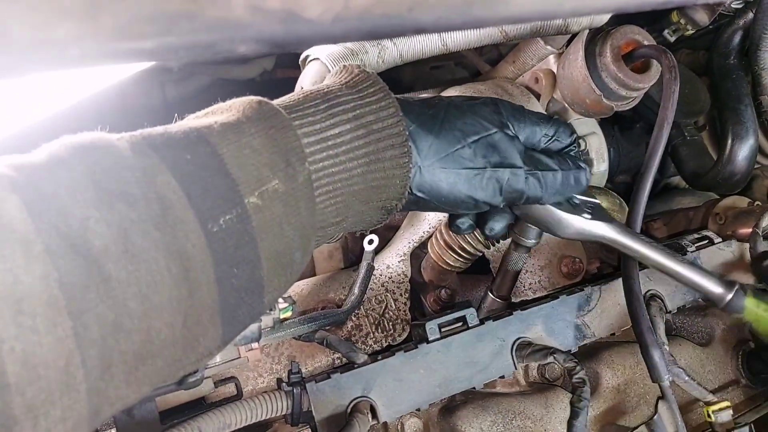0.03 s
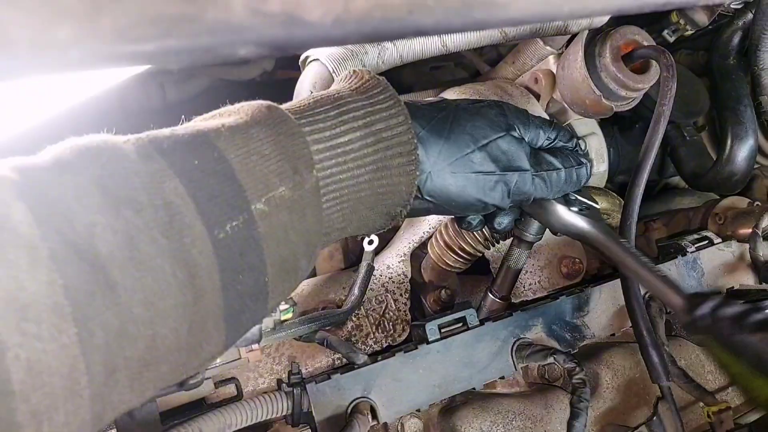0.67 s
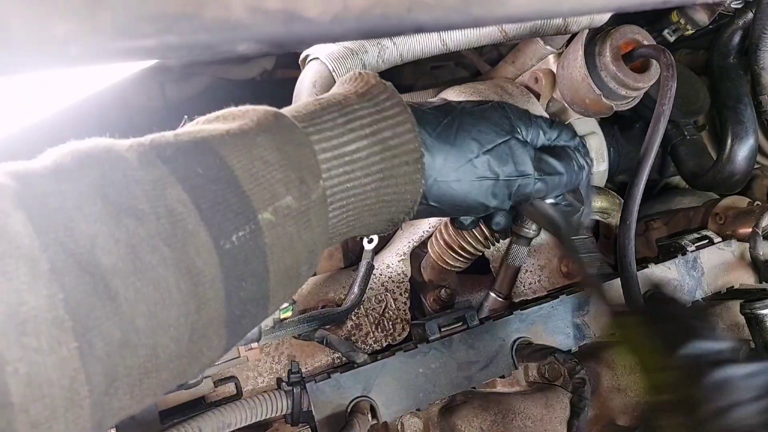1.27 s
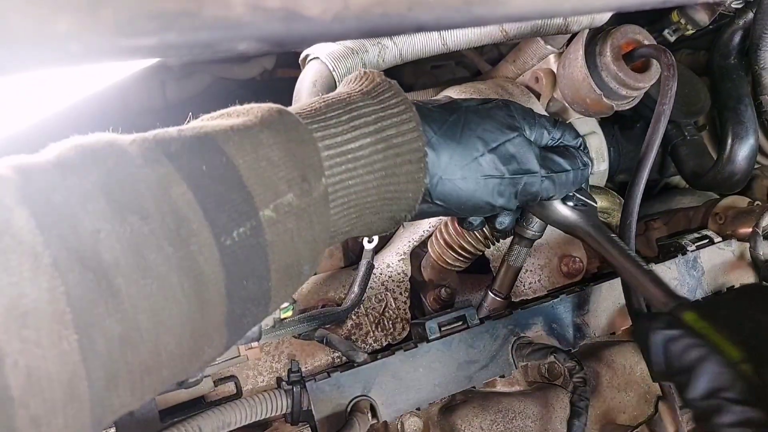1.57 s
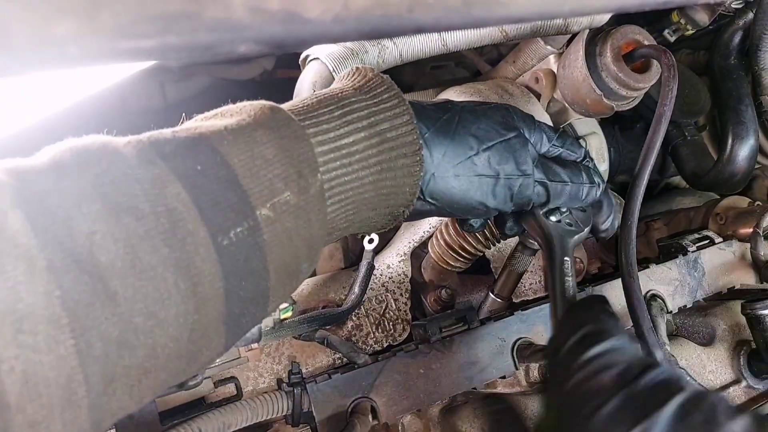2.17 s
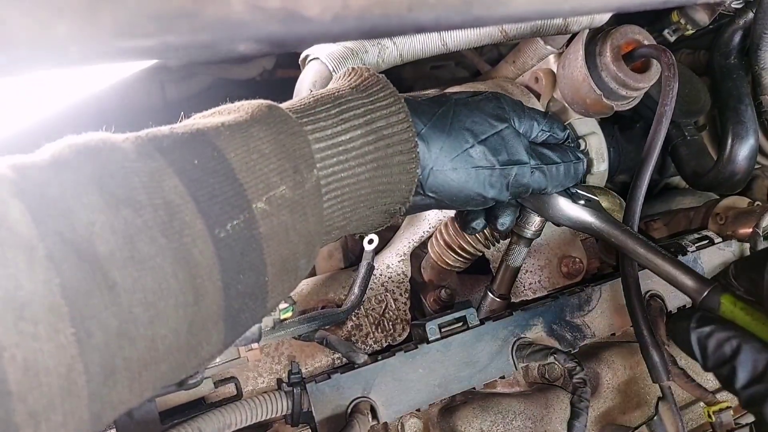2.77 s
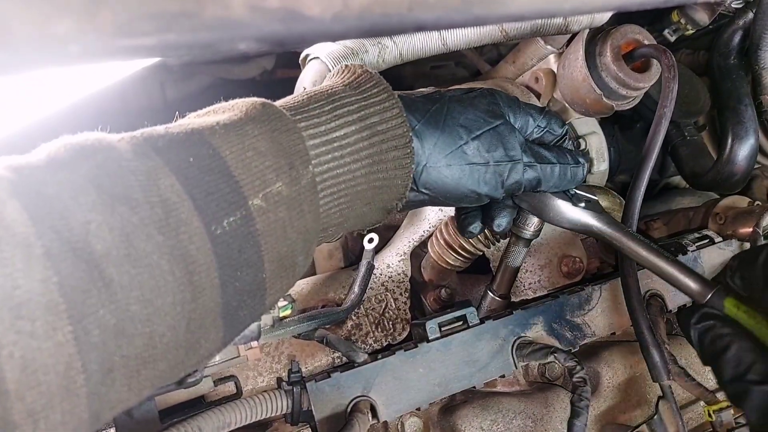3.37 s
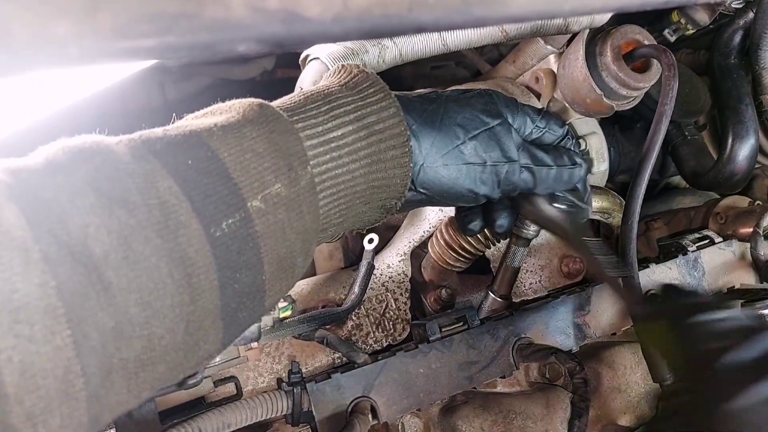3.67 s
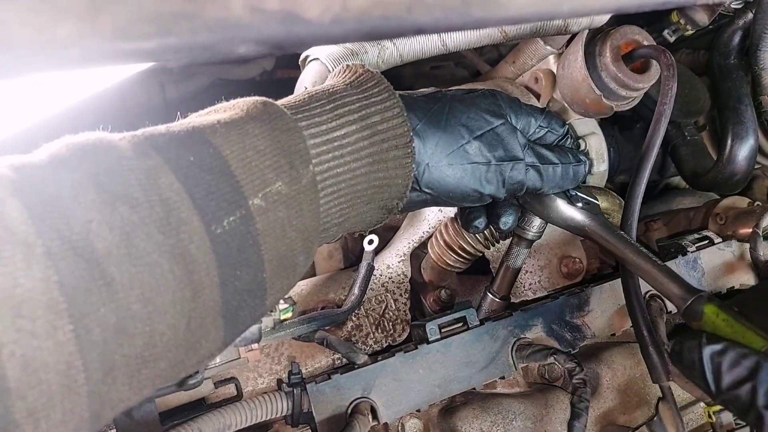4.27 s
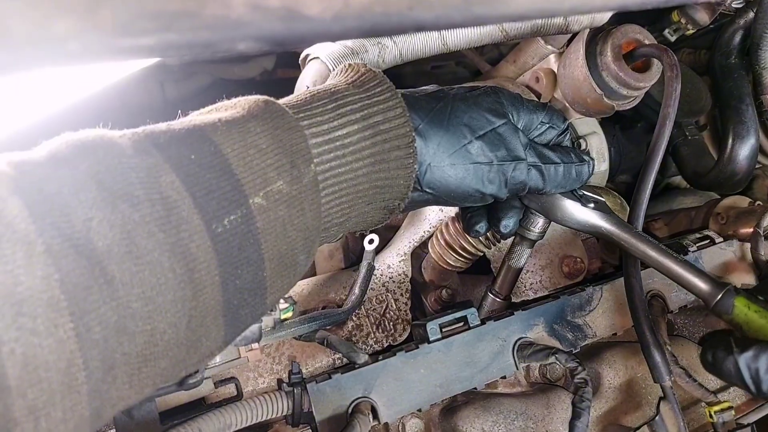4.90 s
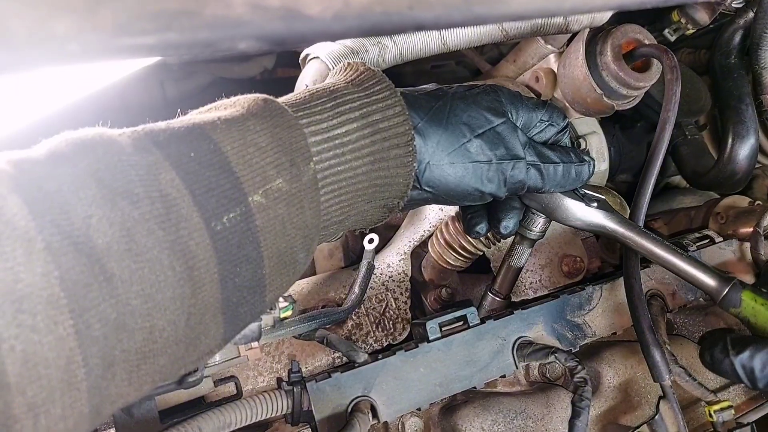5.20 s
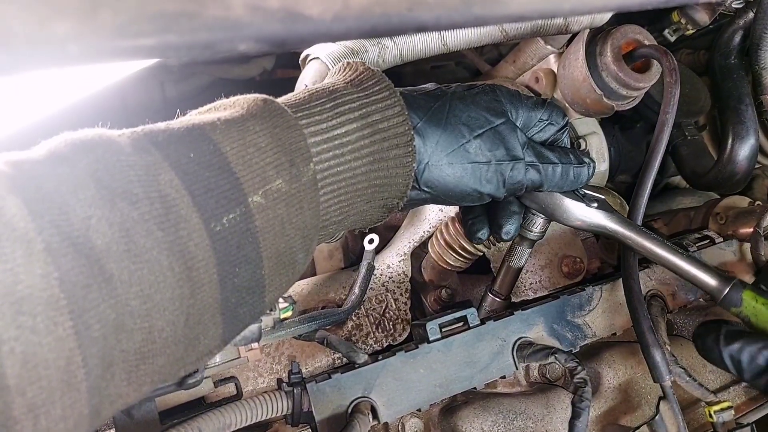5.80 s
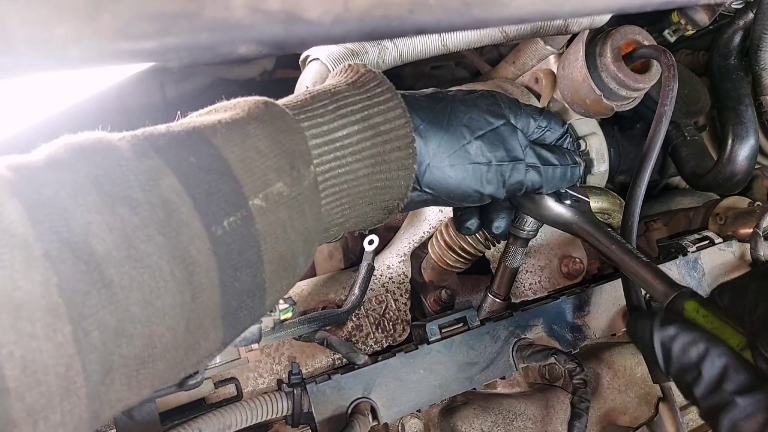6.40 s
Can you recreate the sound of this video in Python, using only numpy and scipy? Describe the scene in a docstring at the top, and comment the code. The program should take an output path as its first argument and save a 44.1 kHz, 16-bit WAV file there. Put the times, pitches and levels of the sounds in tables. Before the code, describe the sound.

A stuck glow plug grinds in its threads over five irregular pulls of a ratchet, heard close with a brief garage echo. The first pulls creak and squeak; the later ones break into single, ringing metal cracks. Quick ratchet clicks, light knocks and soft glove rubbing fill the gaps and close the sequence, with faint steady air underneath.

```python
"""In a garage, close up, a ratchet backs a seized glow plug out of an engine.
The dry thread sticks and slips: fast slips creak, slow ones part into single cracks, and all ring
the same metal. Now and then friction wakes a short squeal. On each back swing the pawl (the catch
in the ratchet) ticks over the teeth and a glove rubs; the ratchet knocks as it takes up its slack.
A short echo follows the tool, and the air rumbles faintly underneath."""
import sys
import numpy as np
from scipy import signal
from scipy.fft import rfft, irfft, next_fast_len
from scipy.io import wavfile
from scipy.ndimage import uniform_filter1d

SR = 44100
rng = np.random.default_rng(int(sys.argv[2]) if len(sys.argv) > 2 else 0)


def int16_out(signal):
    """Quantize to a 16-bit WAV file."""
    q = np.round(np.clip(np.atleast_2d(signal).T, -1, 1) * 32767)
    wavfile.write(sys.argv[1], SR, q.astype(np.int16))


N = 284445
TAPS = 4096  # samples in the sound of one blow
HZ = np.fft.rfftfreq(TAPS, 1 / SR)
TIME = np.arange(N) / SR

# The first four pulls creak, one curve each. Each point: time in seconds, relative level in dB.
CREAK_CURVES = [
    [(0.0, -32.5), (0.058, -33), (0.08, -24.5), (0.118, -30), (0.138, -42.5), (0.148, -31), (0.154, -34.5)],
    [(0.602, -41.5), (0.606, -35.5), (0.634, -45.5), (0.704, -34.5), (0.722, -27.5), (0.748, -38.5),
     (0.77, -29), (0.782, -43), (0.82, -44.5), (0.846, -24.5), (0.884, -32), (0.894, -23.5), (0.924, -26),
     (0.934, -37)],
    [(1.598, -35), (1.624, -31.5), (1.726, -30.5), (1.738, -21), (1.758, -27.5), (1.792, -20),
     (1.923, -19.5)],
    [(2.608, -33.5), (2.616, -33), (2.716, -27), (2.728, -30.5)],
]
# Each creak slows down. Each row: base slips per second at its start, and at its end.
SLIP_RATES = [(1054, 440), (472, 380), (309, 190), (239.7, 100)]
# Single slips of the thread. Each row: time in seconds, relative level in dB.
CRACKS = [(1.5892, -24), (1.936, -9.5), (2.5844, -22.5), (2.7395, -14), (2.765, -14), (2.7847, -14),
          (2.8, -12.5), (2.8123, -13), (2.824, -12), (2.8378, -10.5), (2.8563, -12), (2.9246, -15),
          (2.9496, -13), (2.9696, -12), (2.9929, -12), (3.0495, -14.5), (3.0694, -23.5), (3.0986, -12),
          (3.1212, -28.5), (3.2128, -14), (4.0652, -39.5), (4.124, -19), (4.1336, -16.5), (4.1609, -15.5),
          (4.1928, -14.5), (4.2109, -13.5), (4.3298, -38), (4.3597, -14.5), (4.416, -11.5), (4.5149, -31.5),
          (4.5308, -13.5), (4.564, -10.5), (4.641, -13), (4.6605, -10), (4.7561, -12), (4.782, -8.5),
          (4.8424, -8.5), (4.8883, -7.5), (4.9075, -7), (4.9739, -8.5), (5.0813, -12), (5.1061, -8),
          (5.1747, -9.5), (5.2102, -8), (5.2909, -9.5), (5.3304, -8.5), (5.529, -43), (5.6316, -14)]
# Faint creeping between cracks. Each row: start and end in seconds, relative level reached in dB.
CREEPS = [(4.079, 4.206, -45.5), (4.343, 4.407, -43.5), (4.847, 4.877, -35.5)]
# Each pull starts with a loose socket that tightens under load. Each row: start and time until tight
# in seconds, then in dB the extra rattle while loose and the tight socket's ring, thud into the
# engine, bite near 4 kHz, treble and top octave.
PULLS = [(0, 0.071, 4, -12, -5.5, -9.5, -4, 1.5), (.6, 0.27, 10.5, -4.5, -24, -8, -6, 0.5),
         (1.585, 0.27, 15.5, -7.5, -4, -8.5, -9, -4), (2.58, 0.31, 9, -1.5, -1.5, -12, -6, -1),
         (4.06, 0.78, 10.5, -8, -6, -15, -5, -2)]
# Resonances of plug, socket and cylinder head. Each row: pitch in Hz, width in Hz, level in dB.
BODY_RESONANCES = [(76, 41, -17.5), (217.6, 190, -14.5), (370, 200, -26), (704, 200, -15),
                   (1114, 200, -11.5), (1259, 31, -14), (1560, 300, -15.5), (1836, 150, -5.5),
                   (1980, 110, -16.5), (2230, 86, -6.5), (2750, 484, 8.5), (3153, 590, 8), (3482, 110, 6),
                   (3920, 210, 2.5), (4370, 1200, 5.5), (4560, 200, -11.5), (5300, 360, -18.5),
                   (5490, 780, -6), (6060, 1600, -31), (6880, 920, -4), (7913, 830, -3.5),
                   (9387, 380, -26.5), (10400, 4100, -13.5), (11860, 3400, -9.5), (12400, 500, -8),
                   (13740, 353, -20.5), (14300, 820, -12.5), (15700, 670, -15.5)]
# Longer rings of the socket, the handle and the hollow ratchet head.
# Each row: pitch in Hz, relative level in dB, seconds to fade by 60 dB.
SOCKET_RINGS = [(2890, -30, 0.19), (3150, -6.5, 0.044), (4660, -30.5, 0.059)]
HANDLE_RINGS = [(543, -13.5, 0.3), (1286, 0.5, 0.24), (1454, 0.5, 0.15), (1960, -23, 0.75),
                (2930, -15, 0.096), (3083, 0, 0.1)]
HEAD_RINGS = [(1880, -3, 0.068), (2033, -7, 0.048), (2520, -8, 0.041), (4120, -9, 0.017)]
# Squeals of friction. Each row: start and length in seconds, top pitch in Hz,
# share of the pitch lost at both ends, level in dB.
SQUEALS = [(0, 0.052, 2340, .18, -27.5), (0.038, .07, 1970, 0.06, -34.5), (0.697, .09, 973, 0.093, -44.5),
           (0.821, 0.07, 2320, 0.019, -37), (0.906, 0.025, 2435, .08, -27.5),
           (4.09, 0.15, 1515, 0.0091, -48), (6.36, 0.026, 890, .02, -55.5)]
# The ratchet takes up its slack. Each row: time in seconds, energy in dB,
# then handle ring and head clink in dB relative to the knock.
KNOCKS = [(0.235, -17.5, -19, -12), (0.4746, -3, -22, -7), (0.506, -14, -17, -12), (1.352, -7.5, -8.5, -11),
          (2.306, -21.5, -28, -15), (2.426, -13, -16.5, 0.5), (3.713, -10.5, -13.5, -2.5),
          (5.986, -19.5, -18, 0.5), (6.232, -15.5, -12, -2), (6.397, -28.5, -15, -10)]
# Back swings. Each row: first tick and length in seconds, number of teeth, share of speed left at
# the end, then relative levels in dB of the first tick, the last tick and the glove's rub.
BACK_SWINGS = [(0.2909, .108, 6, 0.46, -15.5, -6, -57), (1.161, 0.11, 5, 0.23, -15.5, -18.5, -63),
               (2.159, 0.074, 4, 0.19, -18.5, -17.5, -64.5), (3.5755, 0.05, 3, 0.78, -19, -17.5, -64),
               (6.0596, .0584, 3, 0.47, -15.5, -22, -69.5), (6.2615, 0.018, 1, 0.85, -15, -12, -71)]
# The glove shifts its grip. Each row: middle and length in seconds, relative level in dB.
GRIP_SHIFTS = [(1.475, 0.068, -52), (2.076, 0.025, -60.5), (2.322, .044, -56.5), (3.855, 0.021, -54),
               (6.376, 0.036, -57)]
# Tone colours of a knock, a tick, the glove and the air. Each row: frequency in Hz, relative dB.
KNOCK_COLOUR = [(80, -27.5), (300, -10), (650, -16), (900, -1), (1500, -7), (1850, 5), (2250, -6),
                (2650, 0), (3500, -4.5), (4150, -8.5), (5000, -8.5), (7500, -17), (9500, -27.5),
                (15500, -14.5)]
TICK_COLOUR = [(100, -26), (600, -21), (1100, -11.5), (2000, -4), (3100, 4.5), (4500, -7.5), (5800, -3),
               (7500, -3.5), (9300, -15), (12000, -10.5), (15500, -3.5)]
GLOVE_COLOUR = [(59, -43), (100, -3.5), (266, -3), (634, -14), (891, -4), (1080, -10), (1250, -10),
                (1610, -6.5), (2220, -0.5), (3050, -3), (7140, -6), (9020, -16.5), (12700, -9.5),
                (16000, -12.5)]
AIR_COLOUR = [(15, -63), (25, -31), (58, -12.5), (70, -3), (92, -9), (175, -18), (301, -22), (363, -24),
              (531, -28.5), (591, -29), (1560, -40), (3160, -35), (16000, -38.5)]
# Balance of the two microphone ports. Each row: frequency in Hz, left minus right in dB.
LEFT_BALANCE = [(60, -4.5), (120, -3), (240, -4), (480, 1), (950, 2.5), (1890, 3.5), (3770, 1), (7520, -2),
                (15000, 8)]
# Phase between the ports. Each row: frequency in Hz, radians by which the left leads.
LEFT_LEAD = [(200, -0.5), (600, 0.56), (1250, 1.5), (1720, 3), (2150, 1.78), (2750, 5), (3150, 1.36),
             (4100, 0.31), (5100, 2), (7500, 0.87), (11800, 4.5), (15000, -2)]
# Length of the garage's echo. Each row: frequency in Hz, seconds to fade by 60 dB.
ECHO_FADE = [(150, 0.16), (400, 0.17), (900, 0.11), (3000, 0.35), (8000, 0.12), (15000, 0.16)]
# Strength of that echo. Each row: frequency in Hz, level in dB against the direct sound.
ECHO_LEVEL = [(150, -1.5), (400, -1), (800, -14.5), (2000, -17), (3200, -34), (4500, -26), (7000, -26),
              (14000, -18)]


def thread(grit_db=-13, grit_s=0.0065, low_cut_hz=60, pose_count=4):
    """Every slip rings the plug and socket; crumbs of carbon grind on for a moment after it."""
    times, db = slips().T
    low_db, ring_db, thud_db, bite_db, treble_db, top_db = socket_fit(times)
    body = np.sqrt(sum(amp(level) ** 2 / (1 + (2 * (HZ - hz) / width) ** 2) ** 1.88
                       for hz, width, level in BODY_RESONANCES))
    body *= HZ ** 2 / (HZ ** 2 + low_cut_hz ** 2)
    # the echoes change as the hand and the handle move from pose to pose
    poses = [rfft(metal_blow(body, echo_db=6.5, fade_s=0.018, alike=0.27)) for _ in range(pose_count)]
    shares = [np.interp(TIME, np.linspace(0, TIME[-1], pose_count), row) for row in np.eye(pose_count)]
    crumbs = rng.standard_normal(N) * rng.exponential(1, N) / np.sqrt(2)
    fade = np.exp(-1 / (grit_s * SR))
    # harder slips bite more near the top resonance of the plug, each by its own amount
    bite_db = bite_db + 0.2 * np.clip(db, -8, 8) + 1.7 * rng.standard_normal(N)[:len(times)]
    bite = 1 / (1 + (2 * (HZ - 4200) / 1100) ** 2)
    # each filter passes what lies below its frequency; subtracting two leaves a band
    thud, low, mid, high = (1 / (1 + (HZ / hz) ** 8) for hz in (550, 2100, 5700, 9300))
    bands = [(thud, thud_db), (low - thud, low_db + 7.5), (mid - low, -5.33),
             (high - mid, treble_db + 1.5), (1 - high, top_db + 1.5), (bite, bite_db)]
    out = ringing(SOCKET_RINGS, times, db + ring_db)
    for band, colour_db in bands:
        blows = clicks(times, db + colour_db)
        grit_power = signal.lfilter([1 - fade], [1, -fade], blows ** 2 + 1e-20)
        grit = amp(grit_db) * crumbs * np.sqrt(grit_power)
        for pose, share in zip(poses, shares):
            metal = irfft(pose * causal(band))[:, :TAPS // 2]
            out += convolve((blows + grit) * np.sqrt(share), metal)
    return out


def slips(creak_db=4.5, crack_db=19, creep_per_s=550, swell_db=8.5):
    """All slips, in creaks, creeps and cracks. Each row: time in seconds, energy in dB."""
    runs = [creak(curve, *rates) for curve, rates in zip(CREAK_CURVES, SLIP_RATES)]
    runs += [creak([(start, db - swell_db), (end, db)], creep_per_s, creep_per_s)
             for start, end, db in CREEPS]
    return np.vstack([np.vstack(runs) + [0, creak_db], np.array(CRACKS) + [0, crack_db]])


def creak(curve, first_rate, last_rate, slowing=0.3, jitter=0.17, uneven_db=1.6):
    """The thread lets go at uneven gaps; the rate glides from first to last and drops where loud."""
    times, db = np.transpose(curve)
    t = np.arange(times[0], times[-1], 1 / SR)
    level = np.interp(t, times, db)
    rate = np.geomspace(first_rate, last_rate, len(t)) * amp(-slowing * (level - level.mean()))
    slips_so_far = np.cumsum(rate) / SR
    wait, size = rng.standard_normal((400, 2)).T
    due = np.arange(len(wait)) + jitter * wait
    keep = due < slips_so_far[-1]
    slip_times = np.interp(due[keep], slips_so_far, t)
    energy_db = np.interp(slip_times, t, level + 10 * np.log10(SR / rate))  # rarer slips are bigger
    return np.transpose([slip_times, energy_db + uneven_db * size[keep]])


def socket_fit(times, tight_low_db=-6, sharpen_db_per_s=8.5):
    """A loose socket rattles widely, a tight one rings narrowly. Gives each slip's tone colour in dB."""
    pulls = np.array(PULLS)
    which = np.searchsorted(pulls[1:, 0] - 0.1, times)
    start, tight_s, rattle_db, ring_db, thud_db, bite_db, treble_db, top_db = pulls[which].T
    rattle = rattle_db * np.clip(1 - (times - start) / tight_s, 0, 1)
    # held tight, the thread breaks ever more sharply
    sharper = sharpen_db_per_s * np.maximum(times - start - tight_s, 0)
    return (tight_low_db + rattle,
            ring_db + 0.5 * rattle,
            thud_db + 0.7 * rattle,
            bite_db - 0.62 * rattle + 0.52 * sharper,
            treble_db + 0.84 * rattle + sharper,
            top_db + 0.76 * rattle + sharper)


def squeals(width_hz=170):
    """Friction drives a narrow resonance; pitch and loudness rise and fall with the hand's pressure."""
    out = np.zeros(N)
    fade = np.exp(-np.pi * width_hz / SR)
    for start, length, top_hz, arch, db in SQUEALS:
        span = (TIME >= start) & (TIME < start + length)
        pressure = abs(np.sin(np.pi * (TIME[span] - start) / length))
        friction = (rng.standard_normal((SR // 2, 2)) @ [1, 1j])[:len(pressure)]
        waver = signal.lfilter([1], np.poly([fade, fade]), friction)
        pitch_hz = top_hz * (1 - arch + arch * pressure)
        tone = (waver * np.exp(2j * np.pi * np.cumsum(pitch_hz) / SR)).real
        out[span] += unit(tone) * np.sqrt(len(tone)) * amp(db) * pressure ** 0.3
    return out


def slack_knocks():
    """The ratchet's square peg rattles home in the socket: the head clinks and the handle rings."""
    times, db, ring_db, clink_db = np.transpose(KNOCKS)
    knock = metal_blow(amp(look_up(KNOCK_COLOUR, HZ)), echo_db=18, fade_s=0.081, alike=0.21)
    handle = ringing(HANDLE_RINGS, times, db + ring_db)
    head = ringing(HEAD_RINGS, times, db + clink_db)
    return convolve(clicks(times, db), knock) + handle + head


def pawl_ticks(gain_db=3.66):
    """The pawl drops over each tooth on the back swing; louder ticks are brighter."""
    times, db = np.vstack([teeth(*swing) for *swing, _ in BACK_SWINGS]).T
    treble_db = 9 + 0.25 * db + 0.5 * rng.standard_normal(len(times))
    out = np.zeros((2, N + TAPS))
    for start, energy_db, bright_db in zip(np.round(times * SR).astype(int), db, treble_db):
        tick = metal_blow(amp(look_up(TICK_COLOUR, HZ)), echo_db=9.5, fade_s=0.016, alike=0.18)
        treble_lift = causal(amp(bright_db / (1 + (5500 / (HZ + 1)) ** 4)))
        out[:, start:start + TAPS] += amp(energy_db + gain_db) * unit(irfft(rfft(tick) * treble_lift))
    return out[:, :N]


def teeth(start, length, count, end_speed, first_db, last_db):
    """Evenly spaced teeth pass as the handle brakes steadily. Each row: time in seconds, energy in dB."""
    angle = np.linspace(0, 1, count)
    speed = np.sqrt(1 - (1 - end_speed ** 2) * angle)
    times = start + length * (1 - speed) / (1 - end_speed)
    return np.transpose([times, first_db + (last_db - first_db) * angle])


def glove(gain_db=6.0, grain_db=3):
    """Rubber and cloth drag over steel in short swells of fine grains whenever the handle moves."""
    # Each rub: middle and length in seconds, relative level in dB.
    back = [(start + 0.014, 0.12, db) for start, *_, db in BACK_SWINGS]
    forward = [(start + 0.29, 0.2, -71.5) for start, *_ in BACK_SWINGS]
    jolts = [(time + 0.033, 0.095, -57 + 0.66 * db) for time, db, *_ in KNOCKS]
    swells = np.sqrt(sum(amp(db) ** 2 * np.exp(-(2 * (TIME - middle) / length) ** 2)
                         for middle, length, db in back + forward + jolts + GRIP_SHIFTS))
    grain_times = TIME[::64]
    grains = amp(grain_db * np.interp(TIME, grain_times, rng.standard_normal(len(grain_times))))
    return amp(gain_db) * swells * unit(grains) * np.sqrt(N) * noise(GLOVE_COLOUR, alike=0.1)


def microphone_ports(sound):
    """The two microphone ports hear the engine bay with different level and phase."""
    half_gap = look_up(LEFT_BALANCE, HZ) * np.log(10) / 40 + 0.5j * look_up(LEFT_LEAD, HZ)
    pair = np.roll(irfft(np.exp([half_gap, -half_gap])), TAPS // 2, 1)
    return signal.oaconvolve(sound, pair, axes=1)[:, TAPS // 2:][:, :N]


def garage_echo(sound, onset_s=0.0046):
    """A short blurred echo from bonnet and walls, each band dying at its own speed."""
    hz, t, bands = signal.stft(rng.standard_normal((2, SR // 2)), SR, nperseg=256)
    decay = amp(-60 * t / look_up(ECHO_FADE, hz)[:, None]) * np.minimum(t / onset_s, 1) ** 2
    decay *= amp(look_up(ECHO_LEVEL, hz))[:, None] / np.sqrt(128 * np.sum(decay ** 2, 1, keepdims=True))
    return convolve(sound, signal.istft(bands * decay, SR, nperseg=256)[1])


def still_air(level_db=-70.5):
    """The air in the garage: a faint, steady rumble and hiss."""
    return amp(level_db) * noise(AIR_COLOUR, alike=0.43)


def metal_blow(colour, echo_db, fade_s, alike, spread_s=0.0005938):
    """One blow and its dense echoes off nearby engine parts, in two channels."""
    t = TIME[:TAPS]
    echoes = stereo_hiss(TAPS, alike) * amp(-60 * t / fade_s) * (t > spread_s)
    # bending waves in steel: the treble arrives first, so the blow chirps down
    blow = np.exp(-4j * np.pi * spread_s * np.sqrt(HZ * 4000))
    # long waves pass round small parts without an echo
    spectrum = blow + amp(echo_db) * rfft(unit(echoes)) * HZ / (HZ + 500)
    smooth_level = np.sqrt(uniform_filter1d(abs(spectrum) ** 2, size=31, axis=1))
    return unit(irfft(spectrum * causal(colour / smooth_level)))


def ringing(rings, times, levels_db):
    """A metal part, struck at each time, rings as a few fading pure tones."""
    t = TIME[:3 * TAPS]
    ring = sum(amp(db) * unit(np.sin(2 * np.pi * hz * t) * amp(-60 * t / fade_s))
               for hz, db, fade_s in rings)
    return convolve(clicks(times, levels_db), np.array([ring, ring]))


def clicks(times, db):
    """One click, a single sample long, for each time."""
    return np.bincount(np.clip(np.round(times * SR).astype(int), 0, N), amp(db), N + 1)[:N]


def stereo_hiss(length, alike):
    """White noise in two channels; alike is the share of power they have in common."""
    shared, *own = rng.standard_normal((3, length))
    return np.sqrt(alike) * shared + np.sqrt(1 - alike) * np.array(own)


def noise(colour, alike):
    """Two channels of noise with this tone colour and an average power of 1."""
    size = next_fast_len(N)
    spectrum = rfft(stereo_hiss(N, alike), size)
    spectrum *= amp(look_up(colour, np.linspace(0, SR / 2, spectrum.shape[1])))
    return unit(irfft(spectrum, size)[:, :N]) * np.sqrt(N)


def causal(gain):
    """A filter with this gain that rings only after the blow, never before."""
    log_gain = np.log(np.maximum(gain, 1e-5))
    mirrored = np.concatenate([log_gain, log_gain[..., -2:0:-1]], -1)
    return np.exp(np.conj(signal.hilbert(mirrored)))[..., :len(HZ)]


def convolve(sound, response):
    """Plays a sound through a two-channel response."""
    return signal.oaconvolve(np.atleast_2d(sound) * np.ones((2, 1)), response, axes=1)[:, :N]


def look_up(table, hz):
    """Reads between the rows of a table on a log-frequency scale."""
    row_hz, values = np.transpose(table)
    return np.interp(np.log(hz + 1), np.log(row_hz + 1), values)


def unit(sound):
    """Scales a sound to an average energy of 1 per channel."""
    return sound / np.sqrt(np.mean(np.sum(sound ** 2, -1)) + 1e-20)


def amp(db):
    """Turns decibels into a gain."""
    return 10 ** (np.asarray(db) / 20)


def scene():
    """Thread, ratchet and glove in the garage, over still air."""
    tool = microphone_ports(thread() + squeals() + pawl_ticks() + slack_knocks())
    return tool + garage_echo(tool) + glove() + still_air()


def record(dry):
    """Cuts off the highest treble, above about 16 kHz."""
    low_pass = signal.firwin(255, 15950, window=("kaiser", 9), fs=SR)
    return signal.oaconvolve(dry, low_pass[None], "same", axes=1)


dry = scene()
out = record(dry)
int16_out(out)
```